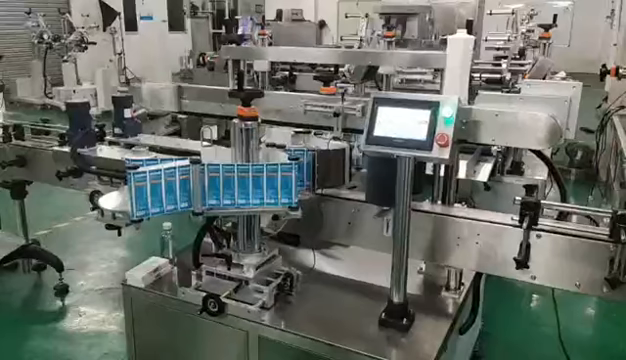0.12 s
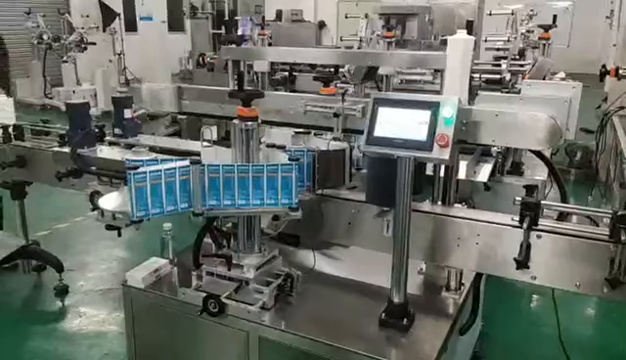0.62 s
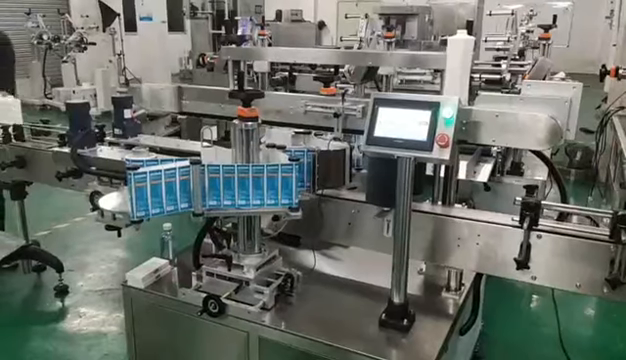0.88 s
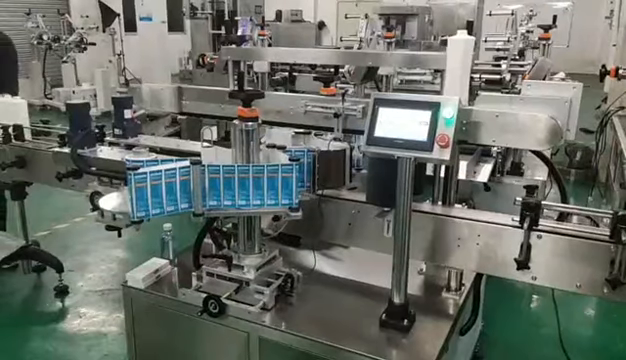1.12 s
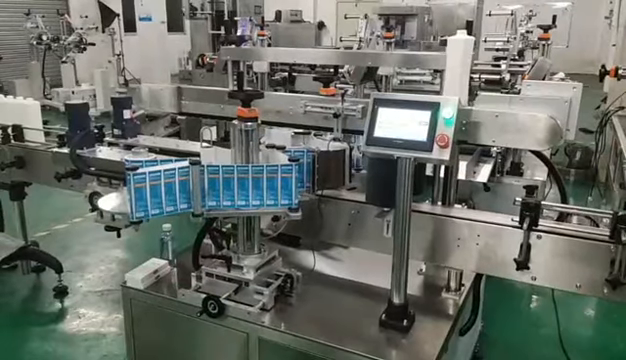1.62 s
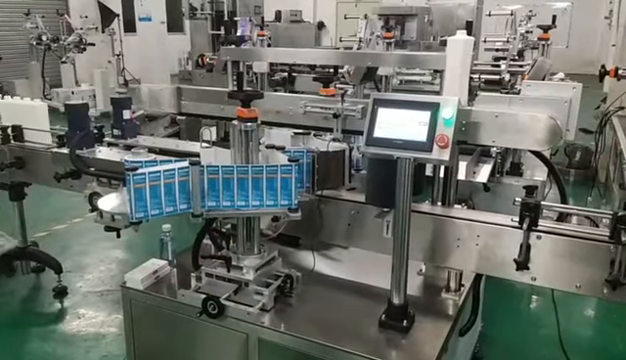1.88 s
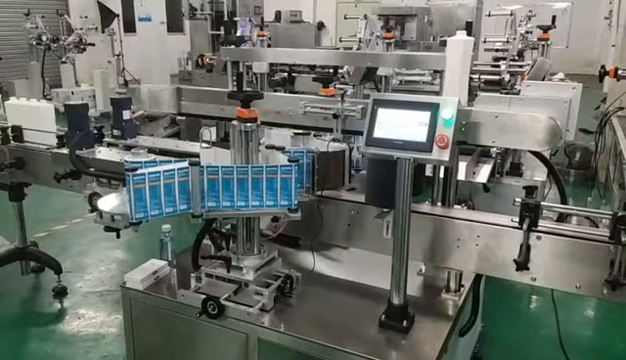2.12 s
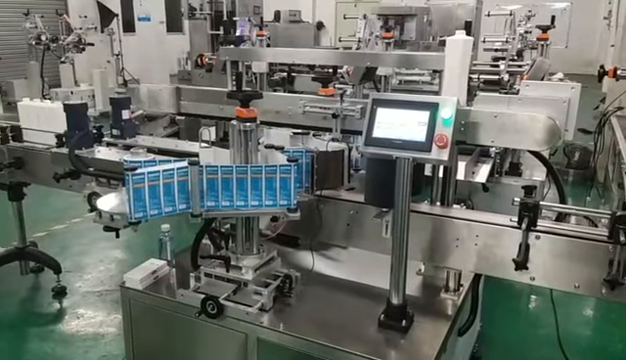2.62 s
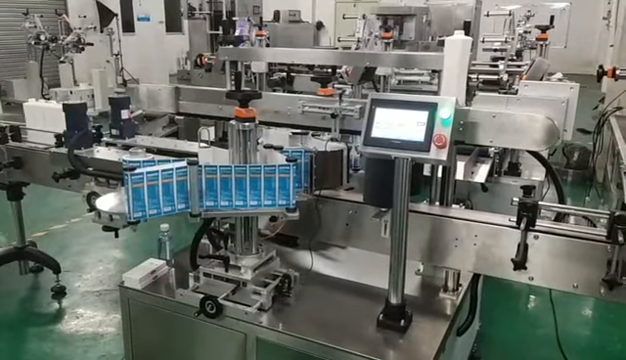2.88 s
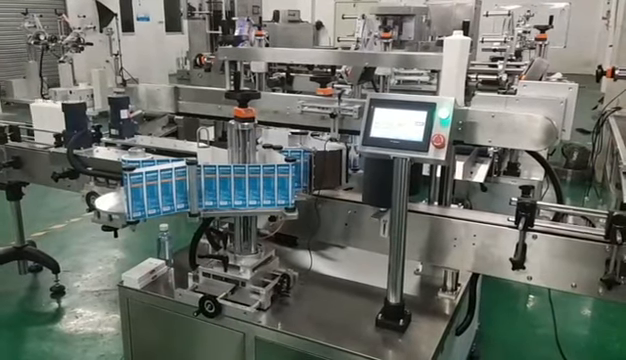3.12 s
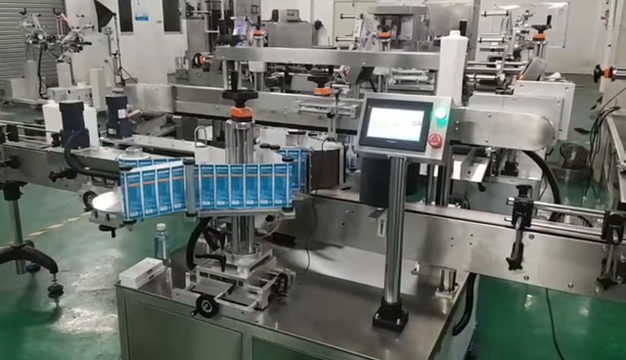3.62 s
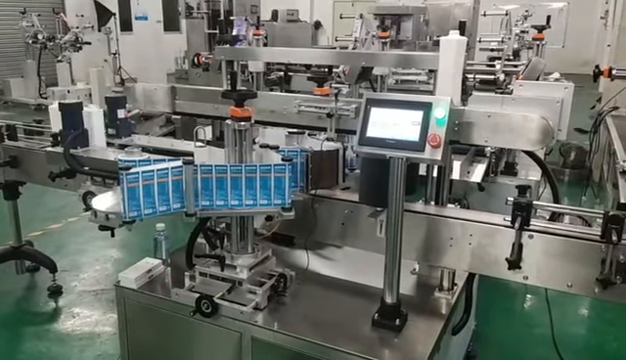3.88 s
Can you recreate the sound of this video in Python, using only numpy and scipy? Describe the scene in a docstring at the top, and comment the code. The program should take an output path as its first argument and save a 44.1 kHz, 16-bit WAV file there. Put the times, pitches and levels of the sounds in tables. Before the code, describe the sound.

Empty plastic canisters knock and rumble on a conveyor in a reverberant hall. Silence until about 0.4 s, when a low, flickering machine drone with motor hum cuts in. Soft air and belt hiss emerges around 1.7 s. From 2.2 s hollow bumps and boom begin, with thud clusters near 2.8, 3.5 and 3.9 s, as the drone strengthens. Phone sound, little deep bass or high treble.

```python
"""Empty plastic canisters rumble along rails and knock together with hollow thuds in a bottling hall.
Knocks and bumps ring the modes of one hollow body; short noise bursts add clatter, a noise tail the hall.
Air and belts hiss: a swell of flickering noise. Behind it the conveyor line drones, as low flickering
noise with two motor tones. After a short silence the drone starts at once; the hiss and canisters come later."""
import sys
import numpy as np
from scipy import signal
from scipy.fft import rfft, irfft, next_fast_len
from scipy.io import wavfile
from scipy.ndimage import uniform_filter1d

SR = 44100
rng = np.random.default_rng(int(sys.argv[2]) if len(sys.argv) > 2 else 0)


def gain_from_db(level_db):
    """Convert decibel levels to linear amplitude factors (20 dB per decade)."""
    decades = np.asarray(level_db, float) / 20
    return 10 ** decades


def generate_wav(sig):
    """Save sig (samples, or channels by samples) to the path in sys.argv[1] as 16-bit PCM at SR."""
    pcm = np.round(np.clip(np.atleast_2d(sig).T, -1, 1) * 32767).astype(np.int16)
    wavfile.write(sys.argv[1], SR, pcm)


N = 176400  # samples, 4 s


def colour(x, table):
    """Filters a sound so that its spectrum follows (f/Hz, level/dB) points."""
    hz, db = np.array(table, float).T
    n = next_fast_len(x.shape[-1])
    f = np.maximum(np.arange(n // 2 + 1) * SR / n, 1)
    gain = gain_from_db(np.interp(np.log(f), np.log(hz), db))
    return irfft(rfft(x, n) * gain, n)[..., :x.shape[-1]]


def unit(x):
    """Scales a sound to an rms of 1."""
    return x / np.sqrt(np.mean(x ** 2))


def curve(table, axis=1):
    """Joins one column of a table by straight lines over time."""
    points = np.array(table, float)
    return np.interp(np.arange(N) / SR, points[:, 0], points[:, axis])


def walk(rate):
    """A slow random curve with a spread near 1, from smoothed random steps (rate in steps per second)."""
    k = int(SR / rate)
    steps = np.repeat(rng.standard_normal(N // k + 1), k)
    return 1.21 * uniform_filter1d(uniform_filter1d(steps, k), k)[:N]


def ring(x, hz, t60):
    """One mode: a resonance at hz that falls by 60 dB in t60 seconds."""
    r = np.exp(-np.log(1000) / (t60 * SR))
    w = 2 * np.pi * hz / SR
    return signal.lfilter([np.sin(w)], [1, -2 * r * np.cos(w), r * r], x)


def lively(table, swell_db, flicker_db, rate):
    """Coloured noise in narrow bands that swell together and flicker alone."""
    spec = rfft(colour(rng.standard_normal((2, N)), table))
    # position of each frequency in bands, about six to the octave well above 300 Hz
    place = 6 * np.log2(1 + np.arange(spec.shape[1]) * SR / N / 300)
    out = 0
    for c in range(30):
        share = np.cos(np.pi / 2 * np.clip(place - c, -1, 1)) ** 2
        out = out + irfft(spec * share, N) * gain_from_db(flicker_db * walk(rate))
    return unit(out * gain_from_db(swell_db * walk(5.72)))


# modes of the hollow canister body: f/Hz, relative level/dB, t60/s after a knock
BODY_MODES = [(185.2, 1, 0.089), (307, -14, 0.07), (372, -5.5, 0.055), (392, -2, 0.15), (463, -7.5, 0.32),
              (533, -2.5, 0.069), (567, -1.5, 0.084), (668, -1.5, 0.04), (742, 1, 0.066),
              (863, -7.5, 0.078), (951, -2.5, 0.041), (1209, -2, 0.041)]
# knocks: t/s, relative level/dB, f/Hz around which the blow favours modes
KNOCKS = [(2.297, -13, 463), (2.740, -13, 536), (2.744, -17, 742), (2.778, -19, 403), (2.786, -18, 514),
          (2.794, -20.5, 742), (2.822, -16.5, 522), (2.828, -19, 392), (2.845, -19, 183),
          (2.867, -17.5, 550), (3.234, -24.5, 565), (3.441, -16.5, 187), (3.455, -12, 560),
          (3.473, -9, 945), (3.488, -11, 900), (3.505, -21, 564), (3.859, -14.5, 184), (3.889, -15.5, 910)]
FAVOUR_OCT = .11  # spread of the favoured modes, octaves
KNOCK_DB, CONTACT_S = -4, 0.00402


def thuds():
    """Each knock pushes the modes near its favoured pitch, and the body rings hollow."""
    t, db, hz = np.array(KNOCKS, float).T
    at = (t * SR).astype(int)
    out = 0
    for f, mode_db, t60 in BODY_MODES:
        share = np.exp(-.5 * (np.log2(f / hz) / FAVOUR_OCT) ** 2)
        # each mode is caught at its own moment of the contact
        late = rng.random((len(at), 2)).T * CONTACT_S
        push = np.zeros((2, N))
        push[[[0], [1]], at + (late * SR).astype(int)] = gain_from_db(db + KNOCK_DB) * share
        out = out + gain_from_db(mode_db) * ring(push, f, t60)
    return out


def bursts(at, size, seconds):
    """Envelope of short rough contacts: a quick rise and a slower fall."""
    x = np.zeros(N)
    x[at] = size
    r = np.exp(-1 / (seconds * SR))
    return signal.lfilter(np.ones(88), [1, -r], x) / 88  # rises over 88 samples, 2 ms


CLATTER_DB, CLATTER_DB_PER_OCT = -26.5, 4.5  # level for a knock favouring 500 Hz, and its slope
CLATTER_S = 0.019  # time constant of the fall


def clatter():
    """Each knock also gives a short burst of noise, stronger when the knock is bright."""
    t, db, hz = np.array(KNOCKS, float).T
    size = gain_from_db(db + CLATTER_DB + CLATTER_DB_PER_OCT * np.log2(hz / 500))
    noise = colour(rng.standard_normal((2, N)), [(500, -8.5), (1200, -3.5), (2500, -5.5), (5000, -21)])
    return bursts((t * SR).astype(int), size, CLATTER_S) * unit(noise)


# loudness of the small bumps along the rails: t/s, level/dB
BUMP_LEVEL = [(2.235, -50), (2.26, -34), (2.68, -38.5), (2.75, -29.5), (3.0, -33), (3.43, -35),
              (3.45, -29.5), (3.62, -36.5), (3.82, -40.5), (3.9, -29.5), (4.0, -38.5)]
BUMPS_PER_S, BUMP_SCATTER_DB = 400, 2.5
BUMP_DAMP = 0.48  # sliding shortens the ring: factor on t60


def rumble():
    """Many small random bumps ring the same hollow body as the canisters slide along."""
    count = int(BUMPS_PER_S * N / SR)
    where = rng.integers(0, N, count)
    size = gain_from_db(BUMP_SCATTER_DB * rng.exponential(1, count))
    out = 0
    for f, mode_db, t60 in BODY_MODES:
        push = np.zeros((2, N))
        push[:, where] = size * rng.standard_normal((2, count))
        out = out + gain_from_db(mode_db) * ring(push, f, BUMP_DAMP * t60)
    return unit(out) * gain_from_db(curve(BUMP_LEVEL)) * (np.arange(N) > 2.235 * SR)


# loudness of the boom before its random wavering: t/s, level/dB
BOOM_LEVEL = [(2.22, -66), (2.27, -36), (2.64, -47), (2.74, -32.5), (3.0, -38), (3.4, -40), (3.52, -33.5),
              (3.63, -45), (3.88, -32), (4.0, -40)]


def boom():
    """The lowest mode of the canisters booms on: noise through one resonance, wavering in level."""
    tone = unit(ring(rng.standard_normal((2, N)), BODY_MODES[0][0], .14))
    return tone * gain_from_db(curve(BOOM_LEVEL) + 3.4 * walk(18))


def canisters():
    """All sounds of the canisters together, with the bass below 165 Hz cut."""
    out = thuds() + clatter() + rumble() + boom()
    return signal.sosfilt(signal.butter(4, 165, "high", fs=SR, output="sos"), out)


HALL_T60_S, HALL_TREBLE_T60_S = 0.99, 0.56
HALL_DB, HALL_RISE_S = -6.5, 0.014


def hall(x):
    """Many blurred echoes: a noise tail, different for mid and side, whose treble dies first."""
    t = np.arange(int(1.5 * SR)) / SR
    low = colour(rng.standard_normal((2, len(t))), [(1000, 1.0), (4000, -9)])
    high = colour(rng.standard_normal((2, len(t))), [(1000, -16.5), (4000, -3.5)])
    tail = low * gain_from_db(-60 * t / HALL_T60_S) + high * gain_from_db(-60 * t / HALL_TREBLE_T60_S)
    tail = tail * np.clip(t / HALL_RISE_S, 0, 1)
    tail = tail / np.sqrt(np.sum(tail ** 2) / 2)
    return gain_from_db(HALL_DB) * signal.fftconvolve(x, tail, axes=1)[:, :N]


# spectrum of air and belts: f/Hz, relative level/dB
HISS = [(590, -38.5), (1000, -9.5), (1340, -4), (2510, -2.5), (3100, -5.5), (4500, -9), (5400, -11),
        (6550, -9.5), (7500, -20)]
# loudness of the hiss: t/s, level/dB, extra treble level/dB
HISS_LEVEL = [(1.74, -56, 4), (1.87, -42.5, 1.5), (1.94, -44, -2), (2.0, -41.5, 1.5), (2.2, -39, -1),
              (2.42, -39.5, 2.5), (2.49, -36, 4.5), (2.58, -39.5, -0.5), (2.85, -42, -1.5),
              (3.01, -37.5, -3), (3.1, -40.5, -0.5), (3.4, -44.5, 0.5), (3.8, -42, 2), (3.91, -34, -5),
              (4.0, -41, -4)]


def hiss():
    """Air jets and sliding belts: flickering noise whose treble also has a level curve of its own."""
    x = lively(HISS, swell_db=.6, flicker_db=1.5, rate=25)
    treble = signal.sosfilt(signal.butter(2, 4000, "high", fs=SR, output="sos"), x)
    x = x + (gain_from_db(curve(HISS_LEVEL, axis=2)) - 1) * treble
    fade = np.clip((np.arange(N) / SR - 1.2) / .5, 0, 1)  # fades in from 1.2 to 1.7 s
    return x * gain_from_db(curve(HISS_LEVEL)) * fade


# spectrum of the distant machines: f/Hz, relative level/dB
DRONE = [(40, -14), (75, -9.5), (112, -13), (139, -4), (390, -1.5), (736, -2), (1070, -8.5), (2500, -10.5),
         (3720, -14), (4800, -19.5), (5400, -25.5), (6300, -27), (7500, -34.5)]
# loudness of the machines: t/s, level/dB
DRONE_LEVEL = [(.37, -51), (.6, -45.5), (.88, -47), (.92, -44), (.97, -47.5), (1.75, -44.5), (1.9, -49.5),
               (2.2, -45), (2.3, -41), (4.0, -39)]
# motor tones: f/Hz, width/Hz (wider means a faster waver), relative level/dB
HUM = [(91.3, 15, -6.5), (141.7, 22, -3.5)]
# loudness of the motor tones: t/s, level/dB
HUM_LEVEL = [(.37, -59), (.6, -51), (1.3, -56.5), (2.0, -45.5), (4.0, -52.5)]


def drone():
    """Distant machines as flickering low noise, with two motor tones made by noise ringing a resonance."""
    hum = 0
    for hz, width_hz, db in HUM:
        tone = ring(rng.standard_normal((2, N)), hz, 4.8 / width_hz)
        hum = hum + gain_from_db(db) * unit(tone)
    machines = lively(DRONE, swell_db=0.71, flicker_db=0.72, rate=24.9)
    return machines * gain_from_db(curve(DRONE_LEVEL)) + hum * gain_from_db(curve(HUM_LEVEL))


LAG_S, LAG_FROM_HZ, LEFT_DB = 0.000448, 896, 0.5


def late_left(x):
    """Treble comes from the right: above the bass the left channel lags and is slightly more sensitive."""
    f = np.arange(N // 2 + 1) * SR / N
    share = 1 - np.exp(-(f / LAG_FROM_HZ) ** 4)
    lag = np.exp(-2j * np.pi * f * LAG_S * share)
    return irfft(rfft(x) * lag * gain_from_db(LEFT_DB * share), N)


PATCH_BINS, PATCH_FRAMES = 3, 3  # patch height, and smoothing in time; a patch lasts twice as many frames
PATCH_DB, DROPOUT_DB = 3, 19  # waver, and extra drop for the lowest patches


def patchy(x):
    """Small time-frequency patches waver in level above the bass; the deepest drop out for a moment."""
    _, _, z = signal.stft(x, nperseg=1024, noverlap=768)
    rows, cols = z.shape[1:]
    w = rng.standard_normal((2, rows // PATCH_BINS + 1, cols // PATCH_FRAMES // 2 + 1))
    w = np.repeat(np.repeat(w, PATCH_BINS, axis=1), 2 * PATCH_FRAMES, axis=2)[:, :rows, :cols]
    w = uniform_filter1d(w, PATCH_FRAMES, axis=2)
    depth = np.clip(np.arange(rows)[:, None] * SR / 1024 / 1000, 0, 1)  # full from 1 kHz up
    change_db = depth * (PATCH_DB * w - DROPOUT_DB * np.maximum(-w - 1, 0))
    return signal.istft(z * gain_from_db(change_db), nperseg=1024, noverlap=768)[1][:, :N]


START_S, START_RISE_S = .371, 0.00088
# stereo width of the whole sound, side channel: f/Hz, level/dB
WIDTH = [(60, -25), (180, -31), (300, -14), (520, -6.5), (1100, -1)]
# the near canisters spread wider in the bass, extra side: f/Hz, level/dB
CANISTER_WIDTH = [(250, 6), (800, 0)]


def scene():
    """Mid (what both ears share) and side (their difference) are built first, then turned to left and right."""
    cans = canisters()
    near = hall(cans) + cans
    far = hiss() + drone()
    mid = far[0] + near[0]
    side = colour(far[1] + colour(near[1], CANISTER_WIDTH), WIDTH)
    left, right = late_left(mid + side), mid - side
    mid, side = patchy(np.array([left + right, left - right]) / 2)
    gate = np.clip((np.arange(N) / SR - START_S) / START_RISE_S, 0, 1)
    return np.array([mid + side, mid - side]) * gate


def band_limit(x):
    """A steep low-pass at the top of the band."""
    return signal.sosfilt(signal.butter(12, 8400, fs=SR, output="sos"), x)


TOP_HZ = 7500


def record(dry):
    """The phone cuts the deep bass below 60 Hz and, steeply, the top above TOP_HZ."""
    x = signal.sosfilt(signal.butter(2, 60, "high", fs=SR, output="sos"), dry)
    mix = signal.sosfilt(signal.ellip(12, .2, 90, TOP_HZ, fs=SR, output="sos"), x)
    return band_limit(mix)


dry = scene()
out = record(dry)
generate_wav(out)
```